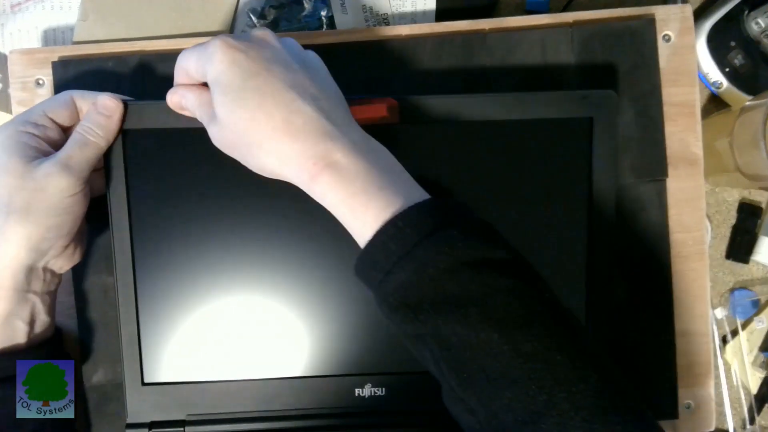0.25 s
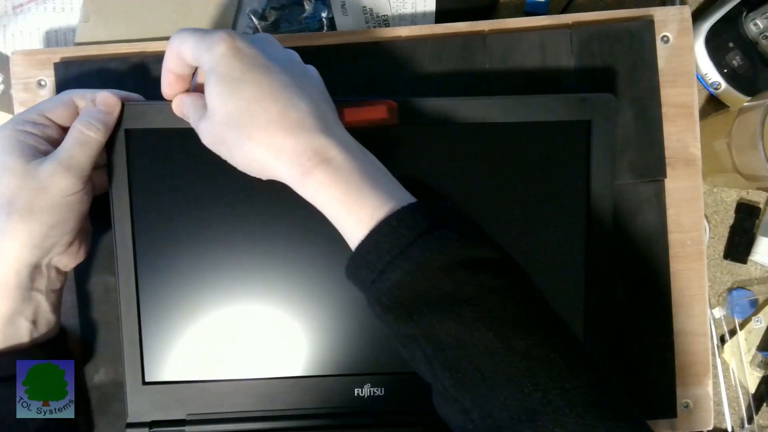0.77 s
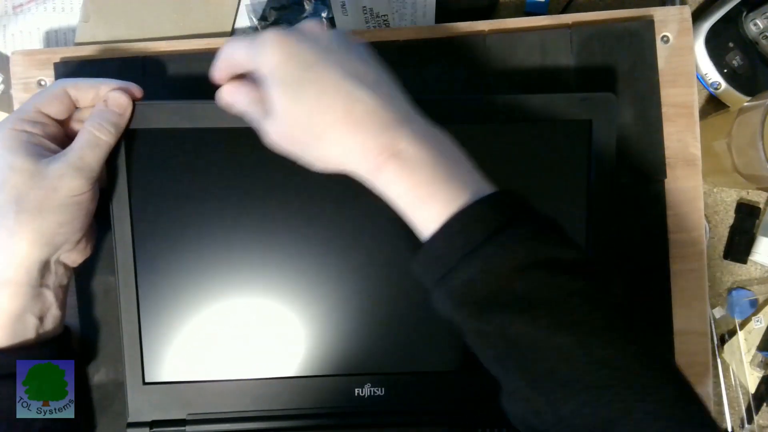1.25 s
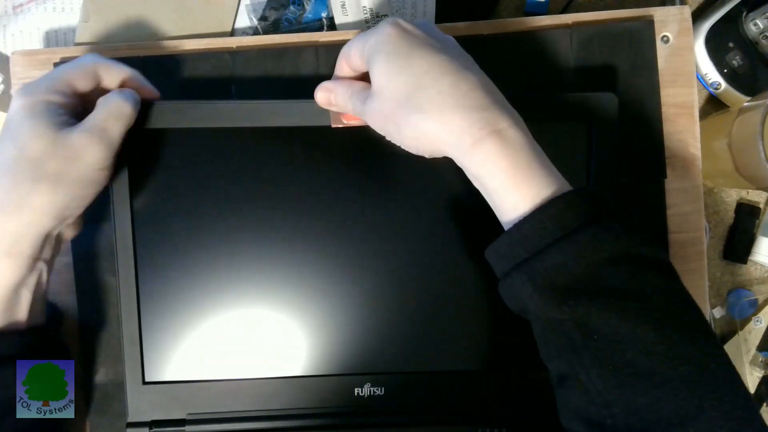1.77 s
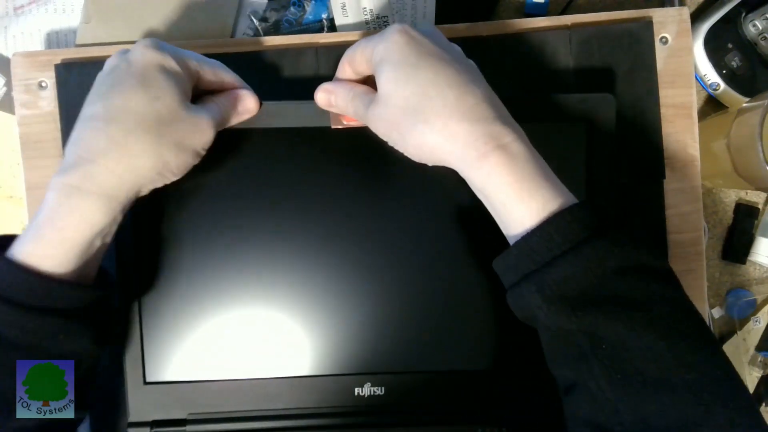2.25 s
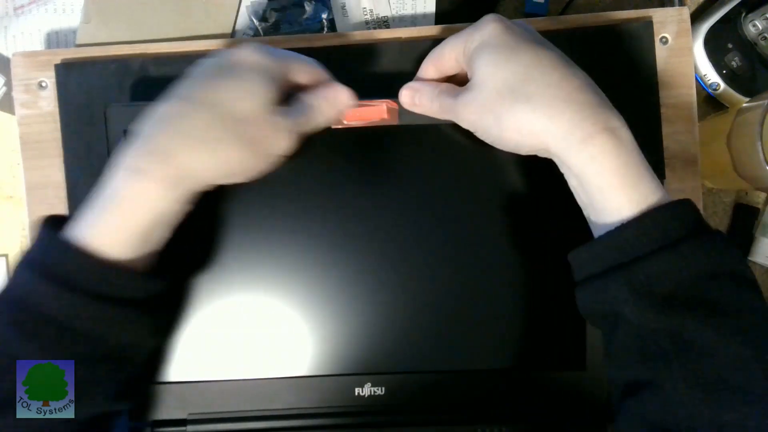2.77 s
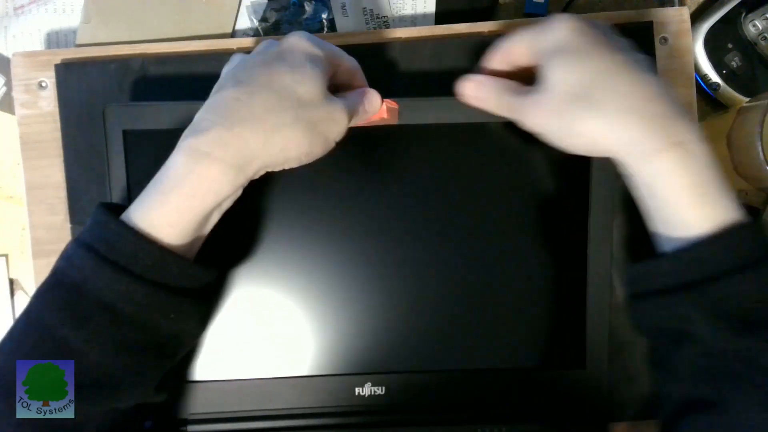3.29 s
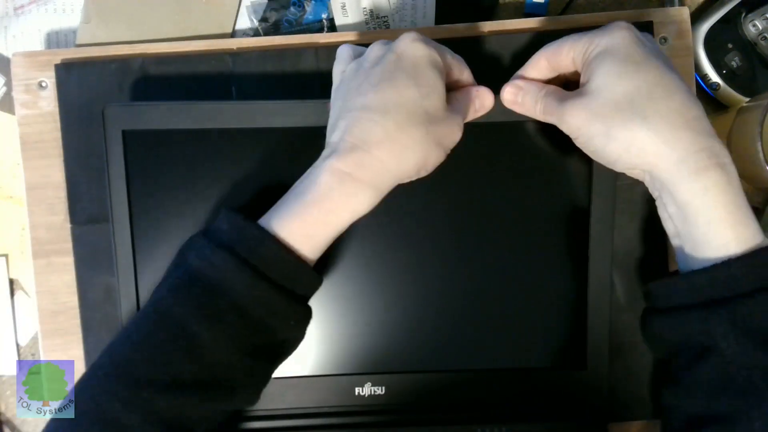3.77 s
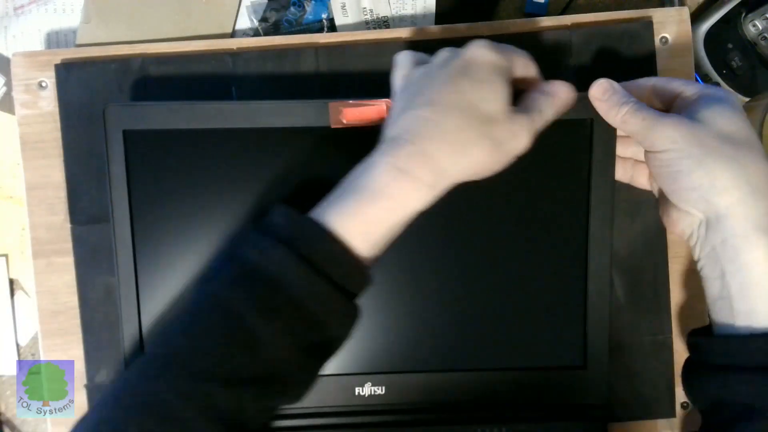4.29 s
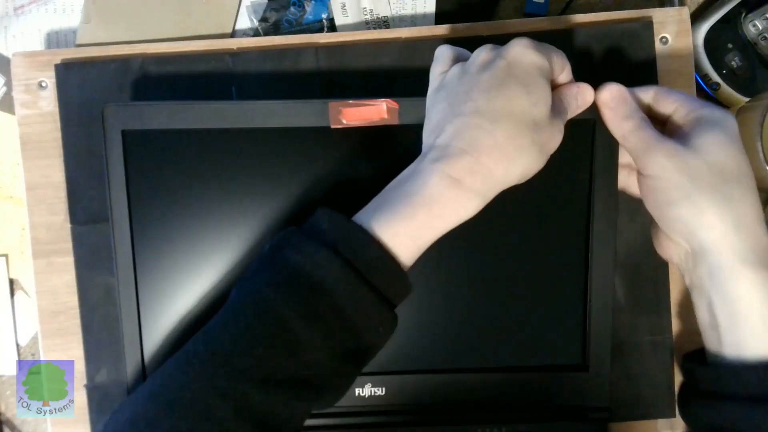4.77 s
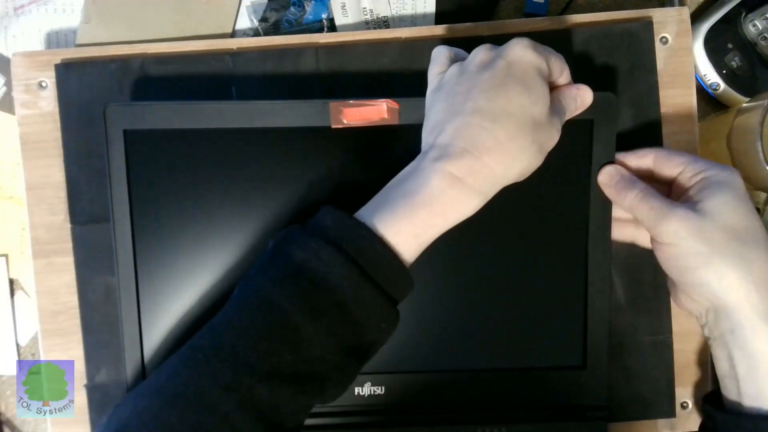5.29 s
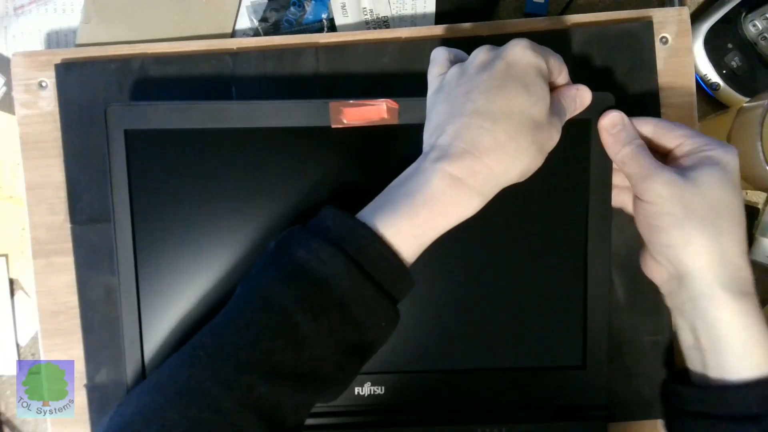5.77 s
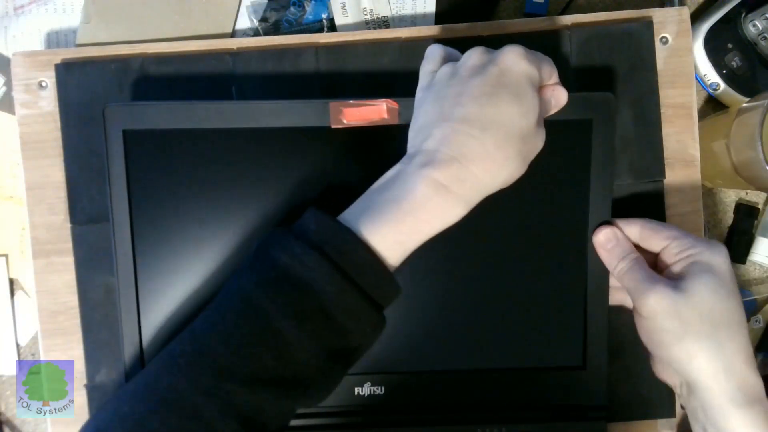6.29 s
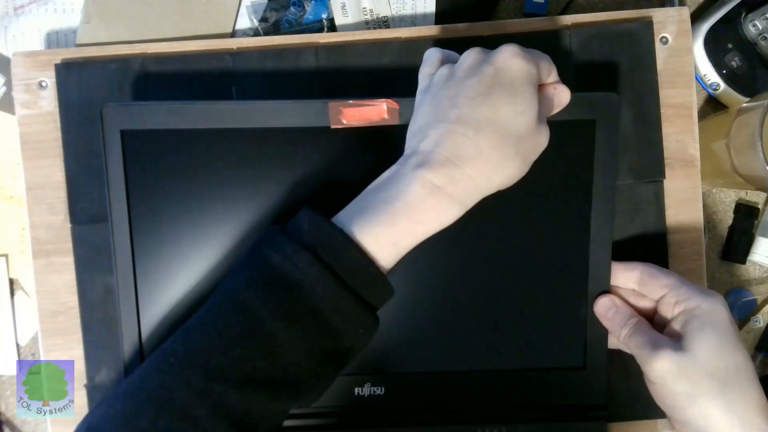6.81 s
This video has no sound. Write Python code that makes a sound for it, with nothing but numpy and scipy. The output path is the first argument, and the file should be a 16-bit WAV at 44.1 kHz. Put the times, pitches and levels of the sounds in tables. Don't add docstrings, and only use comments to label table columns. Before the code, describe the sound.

Sharp plastic clip snaps rattle irregularly one after another, with small finger taps, nail ticks and skin rubbing over faint hum and hiss.

```python
import sys
import numpy as np
from scipy import signal
from scipy.fft import rfft, irfft
from scipy.io import wavfile
from scipy.ndimage import uniform_filter1d

SR = 44100
rng = np.random.default_rng(int(sys.argv[2]) if len(sys.argv) > 2 else 0)


def bounce(signal):
    frames = np.transpose(np.atleast_2d(signal))
    limited = np.clip(frames, -1, 1)
    pcm = np.round(limited * 32767).astype(np.int16)
    wavfile.write(sys.argv[1], SR, pcm)


def how_loud(loudness_db):
    steps = np.asarray(loudness_db, float) / 20
    return 10 ** steps


N = 310905

# start in seconds, peak in dB, ring in Hz, lid share in dB, treble share in dB.
CLIP_SNAPS = [(0.077, -28.5, 2600, -8, -6), (0.0845, -17.5, 2350, -2.5, -20.5),
              (0.265, -21, 4230, -21, -6.5), (0.27, -10, 4300, -7, -23), (0.281, -19.5, 2600, 5.5, -20),
              (1.704, -8.5, 1590, -3.5, -11), (1.711, -20.5, 2600, -0.5, -5), (1.743, -24, 4340, -2, -19),
              (2.177, 3, 2840, -22, -12.5), (2.966, 9, 2300, -16, -1), (3.6905, 5.5, 3990, -19, -6),
              (3.733, 7, 3350, -18.5, -8.5), (3.743, -4.5, 3200, -12, -15.5),
              (4.536, 5, 3410, -19.5, -10.5), (5.091, -18, 2597, -8.5, -17.5), (5.1, -12, 3540, -9, -10.5),
              (5.5796, 7, 3300, -22, -10.5), (5.586, -4, 2650, -8, -6), (6.177, -13.5, 3080, -3.5, -10.5),
              (6.685, -4.5, 3100, -12, -11)]
# start in seconds, peak in dB, ring in Hz, lid share in dB.
PAD_TAPS = [(0.115, -27, 2780, 4), (0.145, -39, 2260, -1), (0.738, -31.5, 4200, -9),
            (0.759, -33.5, 4100, 0.5), (0.845, -34, 4230, -7), (1.157, -41.5, 1120, 2),
            (1.202, -39, 2420, -13), (1.219, -40, 1090, -8), (1.463, -36.5, 4300, -4.5),
            (1.521, -27.5, 3950, -5.5), (1.653, -49.5, 4160, 13), (2.068, -43, 4460, -25),
            (2.449, -30.5, 3900, -9), (2.489, -37, 4580, -7), (2.616, -35.5, 3970, -2),
            (2.684, -34, 1140, -3.5), (2.904, -33.5, 3500, -9), (3.451, -33, 1700, -3.5),
            (3.631, -40, 3970, -24), (3.93, -34, 3870, -19), (4.097, -37.5, 3830, -10),
            (4.143, -36.5, 3420, -7), (4.714, -45, 1100, 5.5), (5.038, -26, 2287, -7),
            (5.305, -39, 2070, -14), (5.914, -44, 1130, -10.5), (6.409, -32.5, 3500, -31),
            (6.853, -40, 2610, 11.5), (6.889, -44, 2350, 7), (6.93, -25, 3370, -12)]
# start in seconds, peak in dB, ring in Hz, treble share in dB.
NAIL_TICKS = [(0.969, -46, 4270, -8), (1.332, -45.5, 1060, -3), (1.351, -32, 4570, -2),
              (1.58, -37, 4270, -11), (2.552, -34.5, 3960, -11), (3.192, -30, 3920, 6),
              (3.366, -29.5, 4390, 12), (4.786, -31, 3765, -8), (4.848, -42, 3850, -15.5),
              (5.364, -26, 2930, 1), (5.533, -47, 1105, -12.5), (5.853, -33.5, 2590, 5),
              (5.99, -30.5, 4030, 1.5), (6.028, -43.5, 1096, -12), (6.075, -32, 4080, -11),
              (6.421, -25.5, 3900, -7.5), (6.98, -29, 3300, -14.5)]
# frequency in Hz, level in dB per Hz.
FRAME_TONE = [(100, -45.5), (250, -19.5), (500, -10), (860, -11.5), (1300, -4.5), (2300, 3), (4000, 0.5),
              (5200, -1), (6300, -8.5), (8000, -13), (10500, -20), (13000, -35.5)]
# frequency in Hz, width in Hz, level in dB.
FRAME_MODES = [(1066, 58, 9.5), (1178, 170, 5.5), (1370, 160, -6), (1640, 190, -9), (2400, 210, 0.5),
               (3070, 250, -5), (3990, 220, 3.5), (4560, 250, 0), (5010, 110, -6)]
# frequency in Hz, width in Hz, level in dB.
LID_MODES = [(120, 120, -23), (200, 110, -17), (310, 90, -12), (665, 160, 0), (1062, 100, -4)]
# frequency in Hz, level in dB per Hz.
IMPACT_TREBLE = [(5500, -35), (7000, -13), (10000, -12), (12500, -6), (14500, 0), (15600, -6), (16200, -30)]
# time in seconds, lag of the left channel in samples.
LEFT_LAG = [(0, -3), (2.0, -0.7), (3.6, 2.5), (7.0, 3)]
# middle in seconds, length in seconds, level in dB.
LID_PRESSES = [(0.106, 0.22, -53.5), (0.774, 0.16, -59), (1.205, 0.21, -55), (1.42, 0.52, -62),
               (1.59, 0.22, -56), (1.793, 0.24, -53), (2.565, .3, -61.5), (3.3, 0.25, -64.5),
               (4.147, .13, -64), (4.715, .26, -60), (5.366, 0.2, -65), (6.077, 0.21, -65),
               (6.46, .22, -64.5), (6.884, 0.17, -61.5), (6.979, 0.12, -51.5)]
# middle in seconds, length in seconds, level in dB,
# lightness in dB (hiss gains what the scrape loses).
FINGER_SLIDES = [(0.774, 0.15, -82, -13), (0.936, .32, -73, 0), (1.205, 0.15, -63, -5),
                 (1.427, 0.26, -64.5, -7), (1.59, 0.23, -68, -7.5), (1.793, .19, -53, -2.5),
                 (2.048, 0.19, -65.5, -2.5), (2.45, 0.093, -56, -4), (2.565, 0.21, -54.5, 2),
                 (2.683, 0.098, -63.5, -2.5), (3.235, 0.15, -67, -8), (3.346, 0.16, -55.5, -3.5),
                 (3.97, 0.18, -75, 6), (4.147, .132, -61, .4), (4.266, 0.17, -65, 2.5),
                 (4.715, 0.244, -72, 1), (4.944, 0.5, -64, 0), (5.366, 0.14, -63, -1.6),
                 (6.077, .18, -60, -1), (6.46, .08, -64, 3), (6.589, 0.28, -61.5, -0.5),
                 (6.884, 0.095, -71, -2.5), (6.979, 0.27, -53.5, -1.5)]
# middle in seconds, length in seconds, level in dB.
SLEEVE_SWISHES = [(2.826, .22, -59.5), (3.566, .15, -62), (6.09, 0.11, -66), (6.46, 0.13, -62),
                  (6.98, 0.19, -63)]
# frequency in Hz, level in dB per Hz.
CREAK_TONE = [(450, -30), (590, -8), (665, 0), (760, -10), (900, -22), (1070, -6), (1300, -16), (1800, -35)]
# frequency in Hz, level in dB per Hz.
SCRAPE_TONE = [(900, -30), (1500, -11), (3300, -9), (3900, -5), (4350, 2), (4900, -4), (5600, -12),
               (8000, -24)]
# frequency in Hz, level in dB per Hz.
FIZZ_TONE = [(4500, -23), (6000, -6), (8000, -2.5), (10000, -5), (12000, -31)]
# frequency in Hz, level in dB per Hz.
SHEEN_TONE = [(9500, -26), (12500, -10), (14500, 0), (15700, -4), (16100, -40)]
# frequency in Hz, t60 in seconds, level in dB, side level in dB.
ROOM_TAIL = [(250, 0.25, -5.5, -3), (700, 0.19, -8, -9), (1500, 0.21, -8.5, -8.5),
             (3200, 0.24, -16.5, -3.5), (7500, 0.24, -15, -3), (14020, 0.23, -19.5, -1.5)]
# start in seconds, peak in dB.
BENCH_SHOVES = [(.09, -59), (0.282, -40), (1.71, -39.5), (2.182, -50), (2.969, -30), (3.74, -31),
                (4.54, -39.5), (5.1, -48), (5.59, -38), (6.688, -44), (6.959, -47)]
# frequency in Hz, level in dB, t60 in seconds.
BENCH_SWINGS = [(33.76, -3, 0.29), (69.74, -10.5, .13)]
# frequency in Hz, width in Hz, level in dB, depth of waver.
HUM_LINES = [(119.8, 5, -65, .9), (137, 9, -65, 1.6), (550, 6, -77, .8), (3709, 4, -71.5, .3),
             (3741, 5, -75, .5), (3830, 90, -77, 5.0), (4290, 8, -74, .6)]
# frequency in Hz, level in dB per Hz.
HISS_TONE = [(12, -34), (30, -9), (70, -9.5), (130, -6), (190, -10.5), (500, -14), (1000, -18.5),
             (1800, -21), (3100, -21), (5000, -25), (6800, -28), (10000, -29), (14500, -26), (15800, -25),
             (16100, -59.5)]
# frequency in Hz, likeness from 0 to 1.
HISS_LIKENESS = [(60, 0.7), (200, 0.38), (1300, 0.27), (4000, 0.0054)]

SNAP_T60_S, SNAP_T60_S_PER_DB = 0.064, -0.0025
TAP_TREBLE_DB, TAP_T60_S = -27.5, 0.025
TICK_LID_DB, TICK_T60_S = -11.5, 0.047
SLIDE_FIZZ_DB, SWISH_SCRAPE_DB, SWISH_HISS_DB = -10, -6, 1.9
EARLY_ECHO_DB, HISS_DB = -13, -55
EDGE_HZ = 15800


def evened(x):
    return x / np.sqrt(np.mean(x ** 2) + 1e-20)


def read(points, hz, axis=1):
    columns = np.transpose(points)
    return np.interp(np.log(hz + 1), np.log(columns[0] + 1), columns[axis])


def resonate(x, hz, width):
    r = np.exp(-np.pi * width / SR)
    return signal.lfilter([1 - r, 0, r - 1], [1, -2 * r * np.cos(2 * np.pi * hz / SR), r * r], x)


def colour(points):
    log_gain = np.log(how_loud(read(points, abs(np.fft.fftfreq(4096, 1 / SR)))))
    taps = np.fft.ifft(np.exp(np.conj(signal.hilbert(log_gain)))).real[:2048]
    return taps / np.linalg.norm(taps)


def whitened(x, size=50):
    z = rfft(x)
    flat = z / np.sqrt(uniform_filter1d(abs(z) ** 2, size) + 1e-12)
    return irfft(flat, len(x)) * np.linspace(1, 0, len(x))


def strokes(rows):
    t = np.arange(N) / SR
    return sum(how_loud(db) * np.cos(np.pi * np.clip((t - s) / length, -.5, .5)) ** 2 for s, length, db in rows)


def clip_snaps():
    rows = [(*row, SNAP_T60_S + SNAP_T60_S_PER_DB * row[1]) for row in CLIP_SNAPS]
    return rattles(rows, creep_db=-36.0, crack_db=0.0, grain_db=2.6,
                   ring_width=2600.0, ring_db=-1.5, fizz_speed=1.15)


def finger_ticks():
    rows = [(*row, TAP_TREBLE_DB, TAP_T60_S) for row in PAD_TAPS]
    rows += [(s, db, hz, TICK_LID_DB, treble_db, TICK_T60_S) for s, db, hz, treble_db in NAIL_TICKS]
    return rattles(rows, creep_db=-24.0, crack_db=-6.0, grain_db=5.5,
                   ring_width=1500.0, ring_db=0.5, fizz_speed=1.6)


def rattles(rows, creep_db, crack_db, grain_db, ring_width, ring_db, fizz_speed):
    lead = 220
    t = (np.arange(6000) - lead) / SR
    after = np.maximum(t, 0)
    luck = rng.standard_normal((len(rows), 3, len(t)))
    frame, treble, out = colour(FRAME_TONE), colour(IMPACT_TREBLE), np.zeros((2, N + 9000))
    creep = how_loud(creep_db) * np.exp(-abs(t) * 800)
    crack = 1 + how_loud(crack_db) * np.exp(-(after / 0.0036) ** 2)
    for (s, db, hz, lid_db, treble_db, t60), (hits, clumping, hiss) in zip(rows, luck):
        lumps = how_loud(grain_db * evened(uniform_filter1d(clumping, 40)))
        fade = how_loud(-60 * after / t60) * (1 - np.exp(-after / 0.0001))
        tune = 1 + .035 * np.tanh(hits[0])
        drive = whitened(hits * lumps * (fade * crack + creep)) * np.where(t < 0, .4, 1)

        body = signal.oaconvolve(drive, frame)[:len(t)]
        body = body + sum(how_loud(g) * resonate(body, f * tune, w) for f, w, g in FRAME_MODES)
        clip = resonate(resonate(drive, hz, ring_width), hz, ring_width)
        knock = np.exp(-after / 0.00069) * (t >= 0) + 0.12 * hits * fade
        lid = sum(how_loud(g) * resonate(resonate(knock, f * tune, w), f * tune, w) for f, w, g in LID_MODES)
        sizzle = hiss * lumps * (fade ** fizz_speed * crack + creep)
        fizz = signal.oaconvolve(sizzle, treble)[:len(t)]

        parts = (body, 0), (clip, ring_db), (lid, lid_db), (fizz, treble_db)
        sound = how_loud(db) * sum(how_loud(g) * p / abs(p).max() for p, g in parts) * 0.8
        lag = np.interp(s, *np.transpose(LEFT_LAG))
        at = round(s * SR)
        for channel, shift in zip(out, (lag / 2, -lag / 2)):
            delay = np.sinc(np.arange(17) - 8 - shift) * np.hanning(19)[1:-1]
            channel[at:at + len(t) + 16] += np.convolve(sound, delay)
    return out[:, lead + 8:N + lead + 8]


def rubbing():
    swish = strokes(SLEEVE_SWISHES)
    scrape = strokes([(s, length, db - light) for s, length, db, light in FINGER_SLIDES])
    hiss = strokes([(s, length, db + light) for s, length, db, light in FINGER_SLIDES])
    levels = np.array([strokes(LID_PRESSES),
                       scrape + how_loud(SWISH_SCRAPE_DB) * swish,
                       how_loud(SLIDE_FIZZ_DB) * hiss + swish,
                       hiss + how_loud(SWISH_HISS_DB) * swish])
    *noises, slips = rng.standard_normal((5, N))
    grain = how_loud(np.outer([5.0, 4.5, 1.5, 1.5], evened(uniform_filter1d(slips, 250))))
    tones = CREAK_TONE, SCRAPE_TONE, FIZZ_TONE, SHEEN_TONE
    layers = [evened(signal.oaconvolve(n, colour(tone))[:N]) for n, tone in zip(noises * grain, tones)]
    return (levels * layers).sum(0)


def space(x):
    early = np.zeros((2, 600))
    at = rng.integers(10, 590, 24) + rng.integers(-2, 3, (2, 24))
    np.put_along_axis(early, at, rng.standard_normal(24) * np.exp(-at / 67.0), 1)
    early = signal.lfilter(*signal.butter(2, 1200, 'high', fs=SR), early)

    taps = np.zeros((2, SR // 2))
    at = np.arange(300, SR // 2 - 20, 20)
    at = at + rng.integers(0, 20, (2, len(at)))
    np.put_along_axis(taps, at, rng.choice([-1., 1.], at.shape), 1)
    hz, t, (mid, side) = signal.stft(taps, SR, nperseg=256)
    t60, db, side_db = (read(ROOM_TAIL, hz, axis=k)[:, None] for k in (1, 2, 3))
    side = side * how_loud(side_db)
    fade = how_loud(db - 60 * t / t60) / np.sqrt(t60 * SR / 20 / np.log(1e6))
    tail = signal.istft(np.array([mid + side, mid - side]) * fade, SR, nperseg=256)[1]
    tail[:, :600] += how_loud(EARLY_ECHO_DB) * early / np.linalg.norm(early, axis=1, keepdims=True)
    return x + signal.fftconvolve(x, tail, axes=1)[:, :N]


def thumps():
    t, out = np.arange(12000) / SR, np.zeros((2, N + 12000))
    swing = np.array([sum(how_loud(db - 60 * t / t60) * np.sin(2 * np.pi * hz * t + turn * t / t60)
                          for hz, db, t60 in BENCH_SWINGS)
                      for turn in (-2.5, 2.5)])
    swing = swing * (1 - np.exp(-t / 0.0026))
    for s, db in BENCH_SHOVES:
        out[:, round(s * SR):][:, :len(t)] += how_loud(db) * swing
    return out[:, :N] * how_loud([[-1.6], [1.2]])


def hums():
    t, out = np.arange(N) / SR, np.zeros((2, N))
    for hz, width, db, waver in HUM_LINES:
        noise, start = rng.standard_normal((2, N)), rng.random()
        tone = np.sin(2 * np.pi * (hz * t + start))
        for channel, own in zip(out, (noise[0], noise[0] + 1.4 * noise[1])):
            channel += how_loud(db) * evened(tone + waver * evened(resonate(own, hz, width)))
    return out


def floor():
    hz = np.fft.rfftfreq(N, 1 / SR)
    left, other = rfft(rng.standard_normal((2, N)))
    same = read(HISS_LIKENESS, hz)
    right = same * left + np.sqrt(1 - same ** 2) * other
    return how_loud(HISS_DB - 0.5) * evened(irfft(np.array([left, right]) * how_loud(read(HISS_TONE, hz)), N))


def scene():
    hands = clip_snaps() + how_loud(-2.0) * finger_ticks() + rubbing()
    return space(hands) + thumps() + hums() + floor()


def band_limit(x):
    return signal.sosfilt(signal.butter(12, 16370, fs=SR, output="sos"), x)


def record(dry):
    band = signal.firwin(401, EDGE_HZ, window=("kaiser", 8), fs=SR)
    limited = signal.oaconvolve(dry, band[None], "same")
    return band_limit(np.clip(limited, -1, 1))


dry = scene()
out = record(dry)
bounce(out)
```